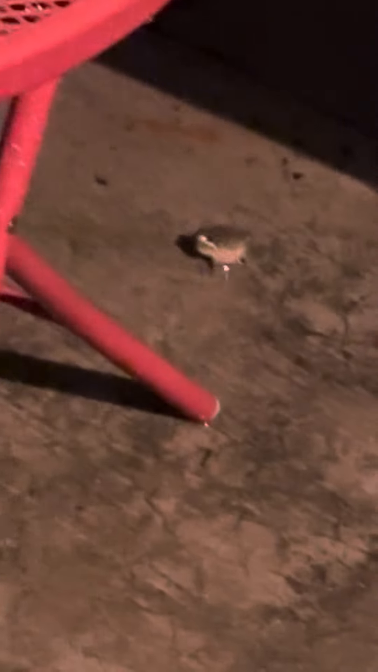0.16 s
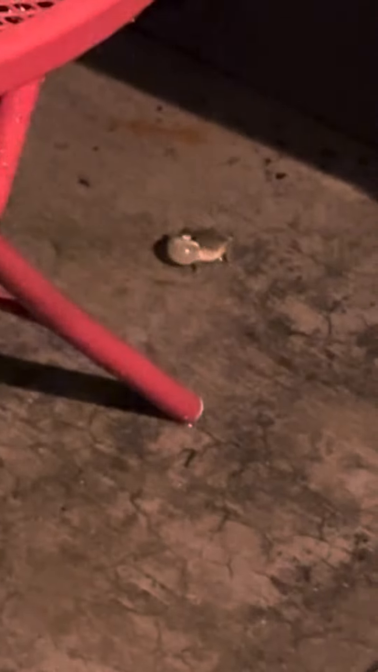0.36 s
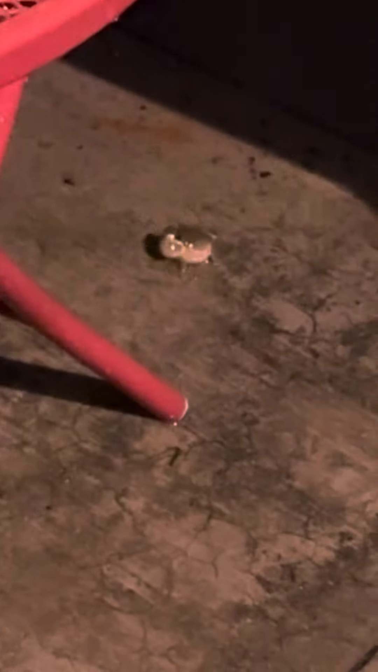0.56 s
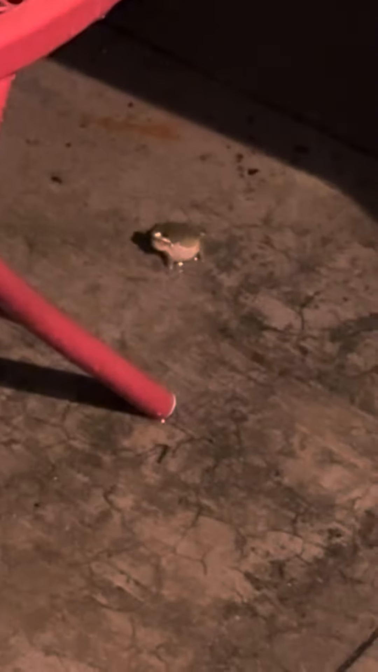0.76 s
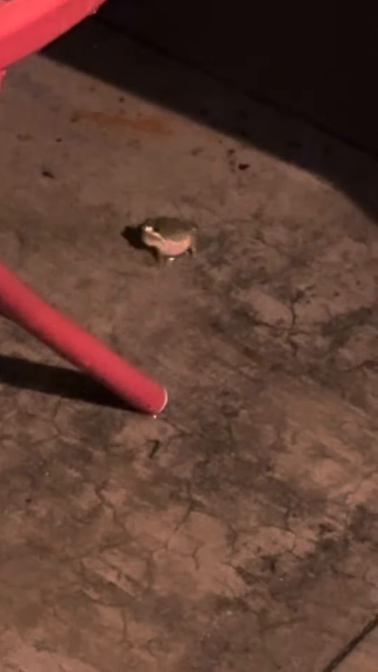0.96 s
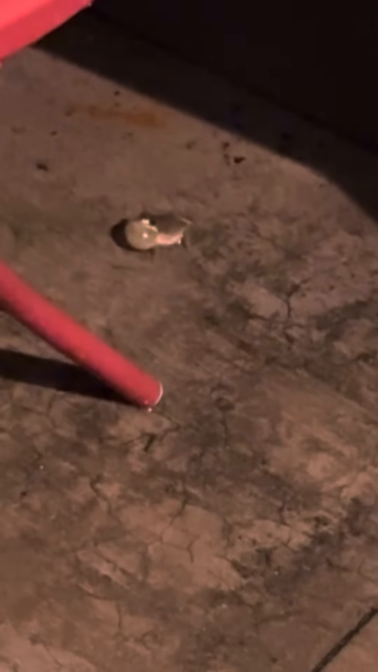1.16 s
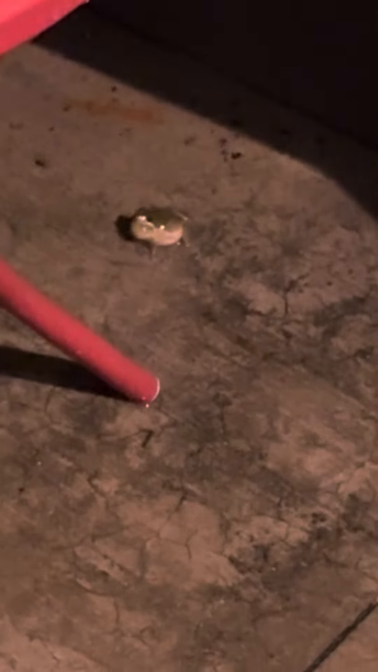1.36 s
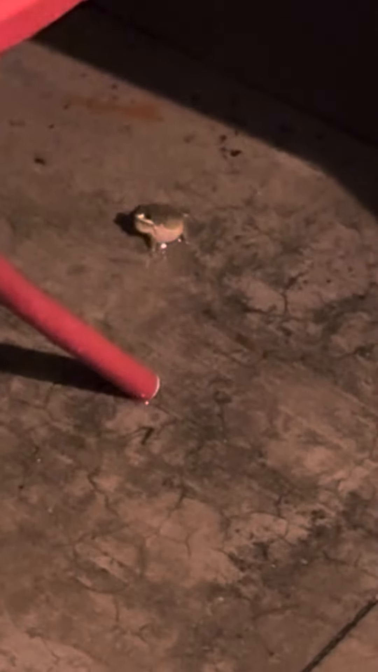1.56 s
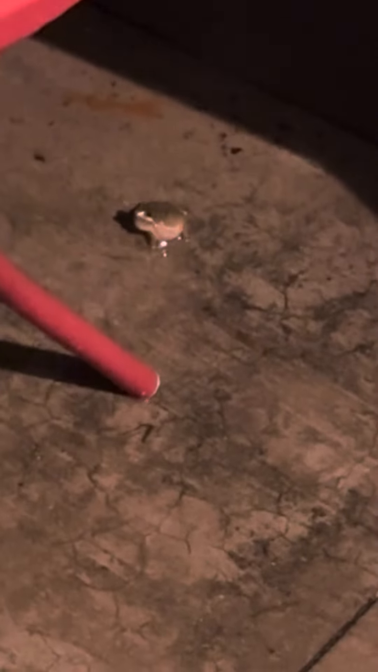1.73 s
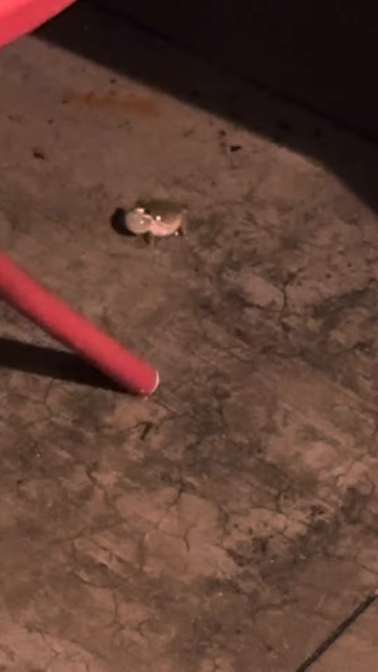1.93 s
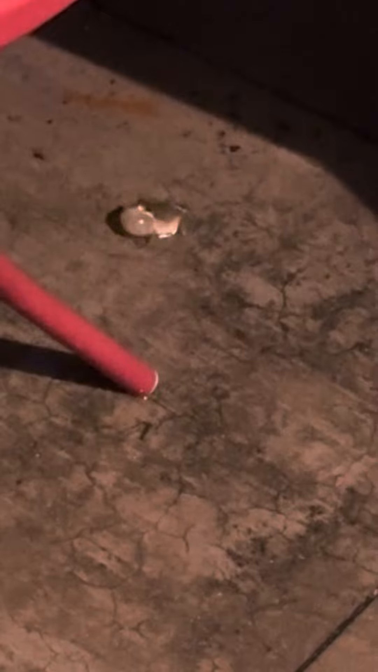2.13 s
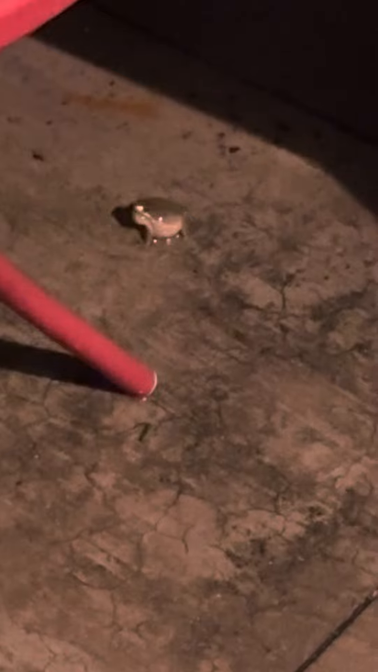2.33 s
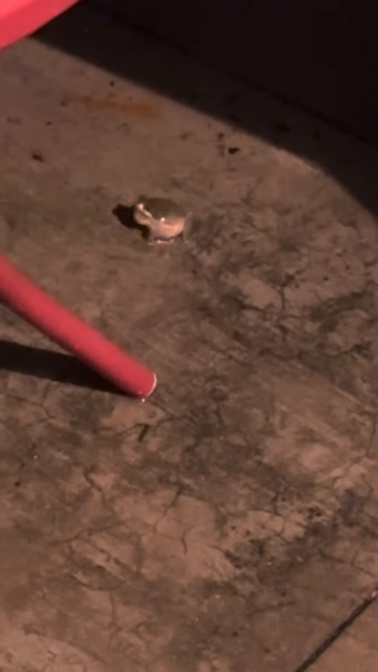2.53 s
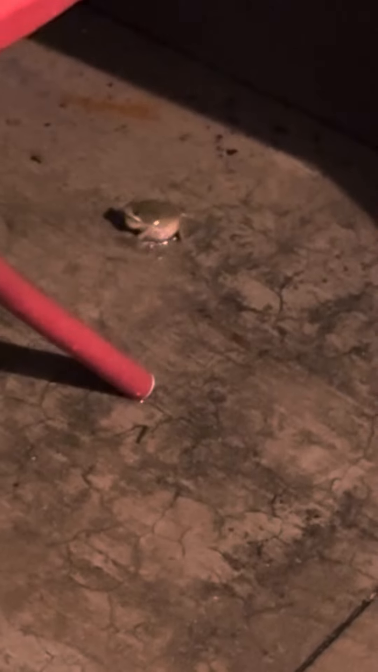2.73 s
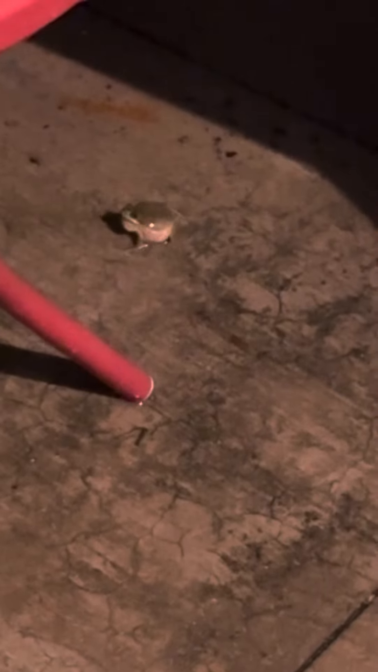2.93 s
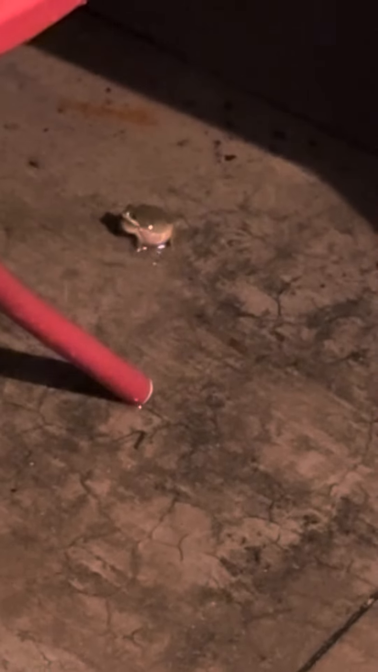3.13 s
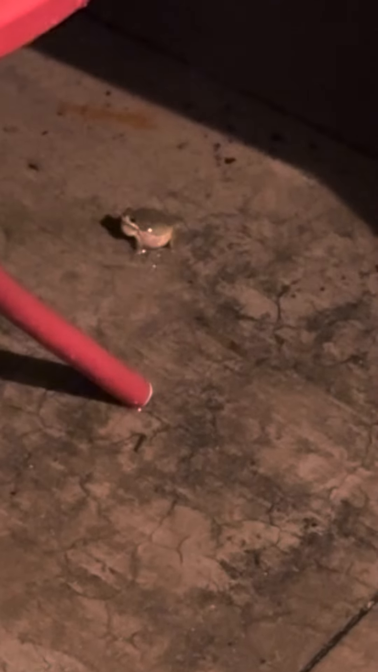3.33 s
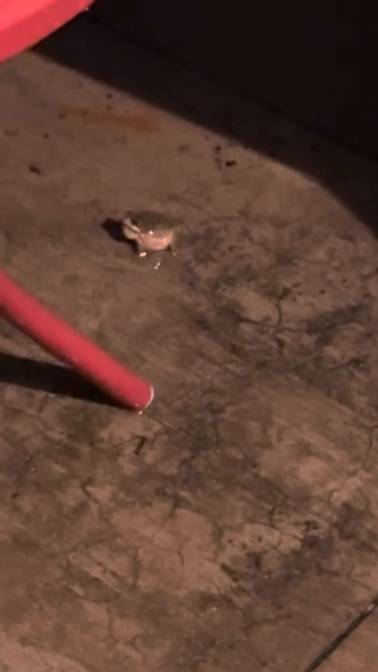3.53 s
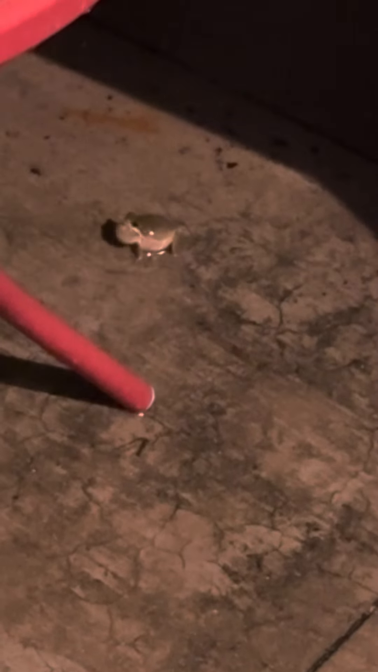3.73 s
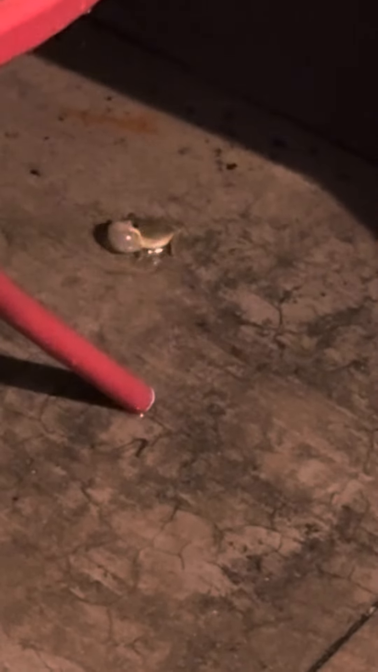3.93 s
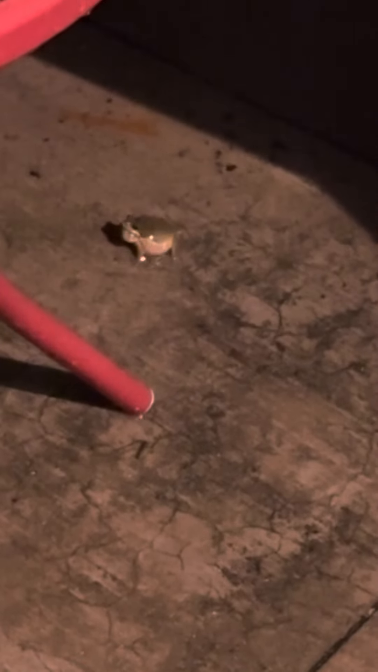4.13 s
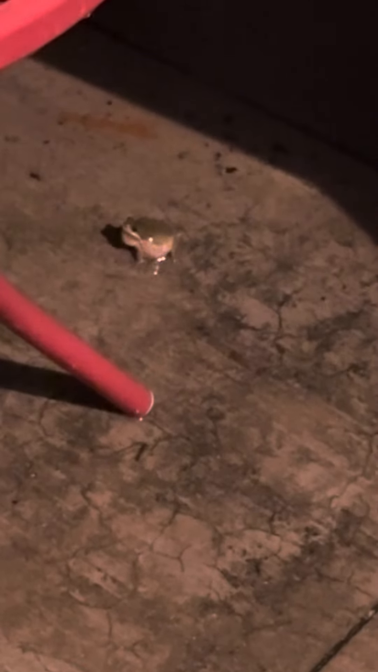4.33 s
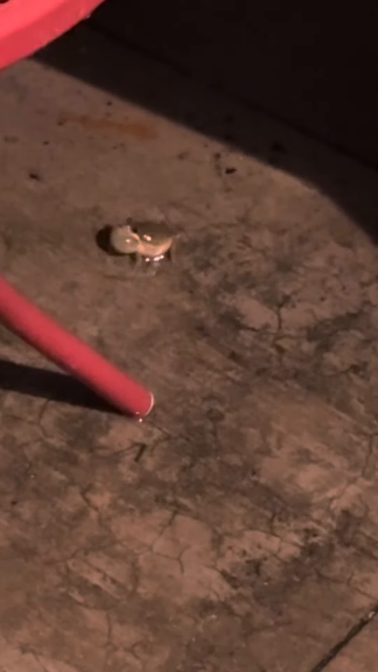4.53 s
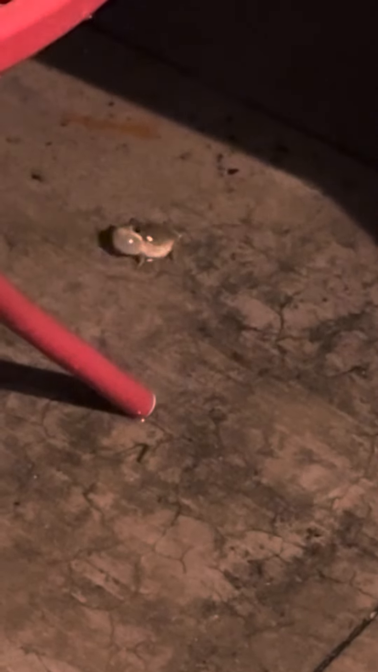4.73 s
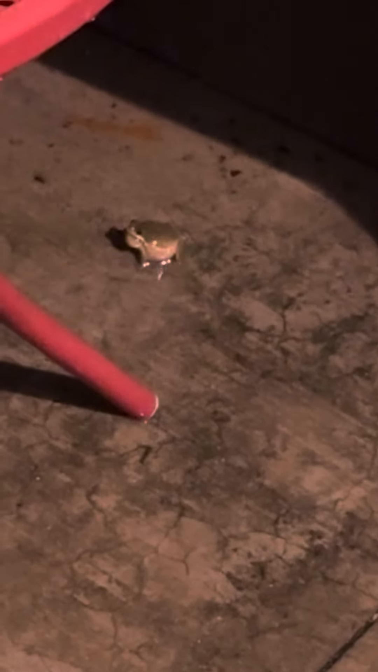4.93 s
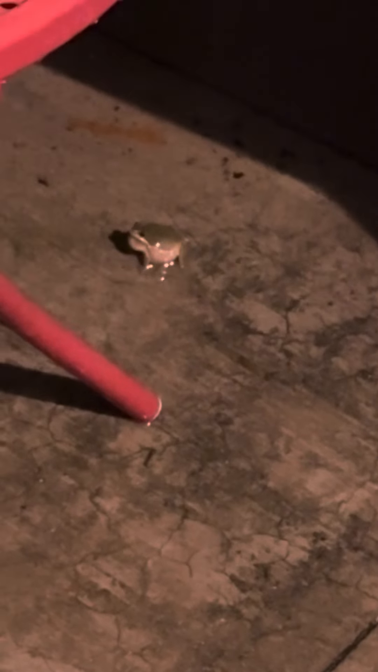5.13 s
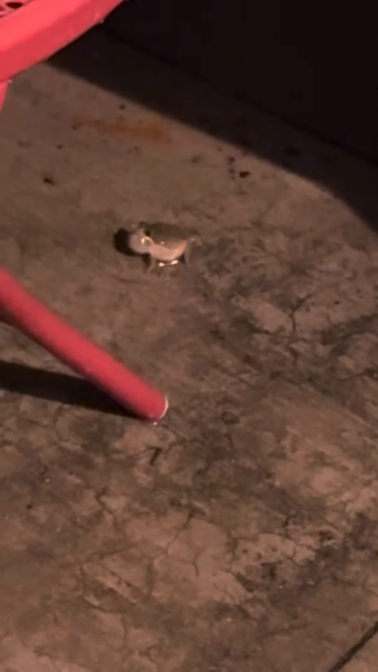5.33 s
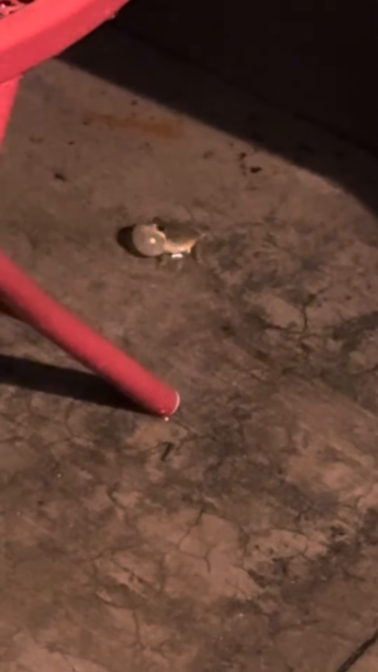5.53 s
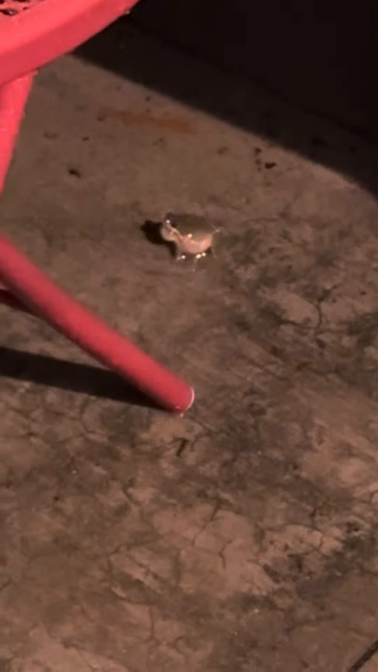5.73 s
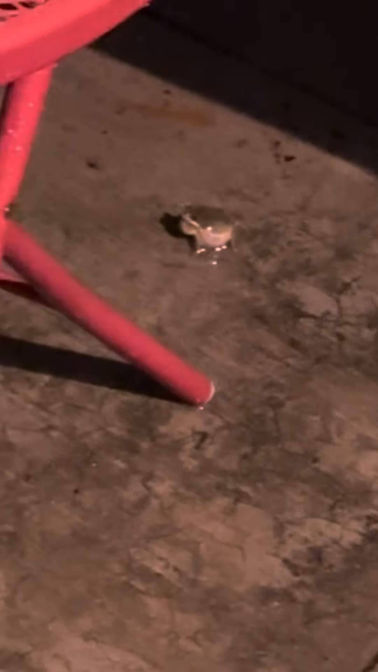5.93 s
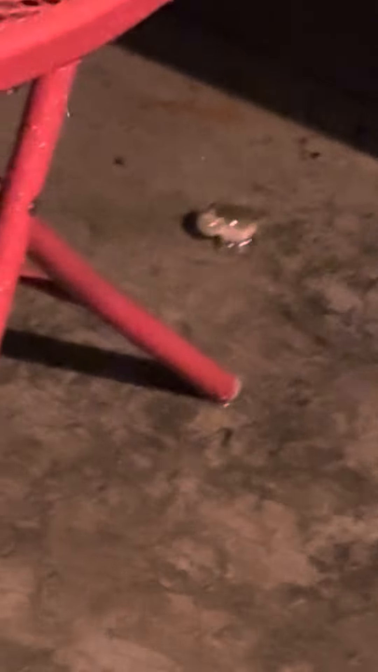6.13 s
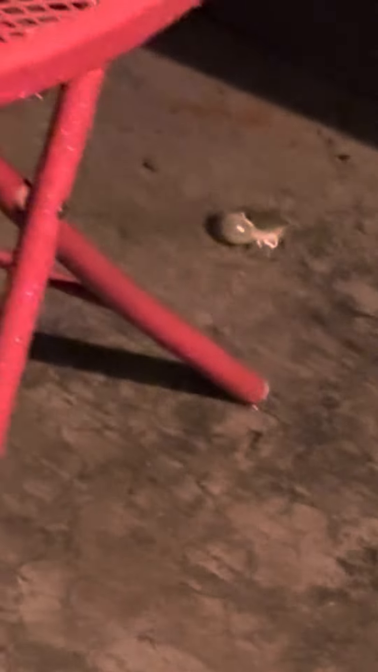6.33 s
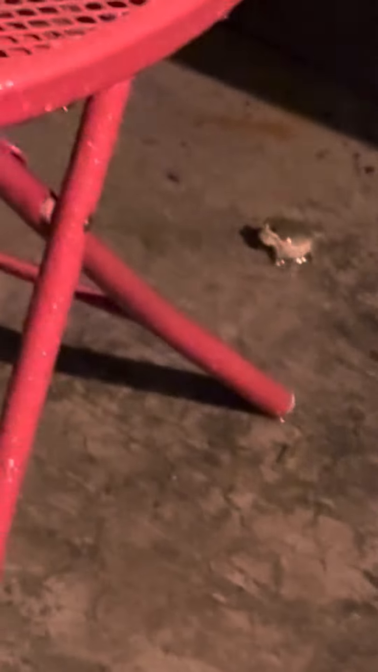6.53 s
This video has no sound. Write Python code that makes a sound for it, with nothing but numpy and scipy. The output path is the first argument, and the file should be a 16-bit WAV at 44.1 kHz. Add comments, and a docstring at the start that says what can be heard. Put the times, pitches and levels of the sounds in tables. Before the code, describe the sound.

Steady outdoor night air: soft distant traffic rumble below, thin light rain hiss above, and sparse sharp clicks of single drops. Over it a little frog repeats a loud ratcheting chirp, fast pulses fused into a rough, nasal creak, seven times at uneven intervals with a pause after the third. Stereo pickup from nearby, fairly dry, with a close wall echo and a very short open-air tail.

```python
"""Night on wet concrete: traffic rumble and steady air (low traffic hum, light rain hiss above), both
shaped noise, run throughout. Single drops tick from the start, each a short band-limited noise crack.
From 0.18 s a small tree frog calls seven times: trains of about 25 pulses, each briefly sounding the
modes of throat, vocal sac and head; a near wall and a short tail echo it.
All is heard in stereo, left and right differing in phase and level by frequency."""
import sys
import numpy as np
from scipy import signal
from scipy.fft import rfft, irfft, next_fast_len
from scipy.io import wavfile
from scipy.ndimage import uniform_filter1d, map_coordinates

SR = 44100
rng = np.random.default_rng(int(sys.argv[2]) if len(sys.argv) > 2 else 0)


def invert_db(x):
    """Field ratio 10**(x/20) for x, a level in decibels (scalar or array-like)."""
    u = np.asarray(x, float) / 20
    return 10 ** u


def bounce(signal):
    """Save signal as a 16-bit WAV file at the path given by the first command-line argument."""
    frames = np.transpose(np.atleast_2d(signal))
    limited = np.clip(frames, -1, 1)
    pcm = np.round(limited * 32767).astype(np.int16)
    wavfile.write(sys.argv[1], SR, pcm)


N = 289737


def unit(x):
    """Scale to rms 1."""
    return x / np.sqrt(np.mean(x ** 2) + 1e-20)


def along(points, hz):
    """Interpolate (frequency [Hz], value) points on a log frequency axis."""
    point_hz, value = np.transpose(points)
    return np.interp(np.log(hz + 1), np.log(point_hz + 1), value)


def wobble(knots_per_s):
    """Smooth random curve through Gaussian knots."""
    knots = rng.standard_normal(int(N * knots_per_s / SR) + 4)
    return map_coordinates(knots, [np.arange(N) * knots_per_s / SR])


def filtered(x, response):
    """Apply a complex response of frequency [Hz] by FFT."""
    size = next_fast_len(N + 8192)
    spectrum = rfft(x, size) * response(np.fft.rfftfreq(size, 1 / SR))
    return irfft(spectrum, size)[..., :N]


def noise(spectrum, patchy_db):
    """Coloured noise of rms 1, with random gain patches in time and frequency."""
    z = signal.stft(rng.standard_normal(N + 512), nperseg=512)[2]
    field = uniform_filter1d(rng.standard_normal(z.shape), 8, 0)
    field = unit(uniform_filter1d(field, 8, 1))
    x = signal.istft(z * invert_db(patchy_db * field), nperseg=512)[1][:N]
    return unit(filtered(x, lambda hz: invert_db(along(spectrum, hz))))


# traffic rumble spectrum: (frequency [Hz], relative density [dB per Hz])
RUMBLE_SPECTRUM = [(12, -64), (20, -32), (35, -17.5), (54, 0), (86, -1), (120, -4.5), (160, -32),
                   (260, -120)]


def rumble():
    """Low-frequency traffic noise of rms 1, common to left and right."""
    return noise(RUMBLE_SPECTRUM, patchy_db=-0.55)


# steady air, low traffic hum below about 500 Hz and rain hiss above:
# (frequency [Hz], relative density [dB per Hz])
AIR_SPECTRUM = [(130, 17), (220, 13), (400, 6.5), (700, 3.5), (1300, 4), (2200, -1), (3000, 3), (4000, -2),
                (5200, -3.5), (6500, -0.5), (9500, -1), (10700, -0.5), (12000, -9.5), (15700, -6)]
# stereo side noise of the air by band: (frequency [Hz], filter gain [dB])
SIDE_GAIN = [(150, -74), (400, -12), (900, -14), (1400, -12.5), (1800, -83), (4500, -78.5), (4950, 6),
             (5350, -75), (6600, -83), (7200, -10), (9000, -6), (11200, -7), (11800, -76), (13700, -78),
             (14300, -12), (15800, -11)]


def steady_air():
    """Traffic hum and rain hiss: common noise of rms 1, plus side noise of opposite sign left and right."""
    spectrum = [(70, -25)] + AIR_SPECTRUM
    side = noise(spectrum, patchy_db=-0.5)
    side = filtered(side, lambda hz: invert_db(along(SIDE_GAIN, hz)))
    return noise(spectrum, patchy_db=1.5) + np.array([side, -side])


# night before flutter: (time [s], rumble level [dB], common steady air level [dB])
NIGHT_LEVELS = [(0.0, -38.5, -38.5), (0.5, -39, -38.5), (1.4, -43, -39.5), (1.7, -40.5, -39),
                (3.2, -42.5, -40), (4.3, -40, -39), (4.7, -45.5, -40), (5.45, -43, -39), (5.8, -44.5, -41),
                (6.57, -45.5, -40.5)]


def night():
    """Rumble and steady air on slow level curves, each with a small random flutter."""
    time_s, *levels = np.transpose(NIGHT_LEVELS)
    rumble_db, air_db = [np.interp(np.arange(N) / SR, time_s, level) for level in levels]
    rumble_db = rumble_db + 0.27 * wobble(6.4)
    air_db = air_db + 0.5 * wobble(12) + 0.3 * wobble(5)
    return invert_db(rumble_db) * rumble() + invert_db(air_db) * steady_air()


# loudest drops: (time [s], level before band filter [dB], centre frequency [Hz])
LOUD_DROPS = [(.3624, -19, 7850), (.5866, -26, 9200), (1.31, -22.5, 8500), (1.4523, -24, 6000),
              (1.939, -19, 10900), (2.2623, -25, 13100), (2.398, -22, 13500), (2.548, -22, 8950),
              (2.6813, -25, 10000), (3.576, -26, 6600), (3.6606, -24, 8000), (4.0087, -20, 9000),
              (4.1125, -25.5, 9000), (4.2423, -31.5, 9000), (4.444, -19, 7650), (6.0026, -27, 7950),
              (6.2985, -22, 11000)]


def drops():
    """Each drop is a decaying noise crack in its own band; 400 faint ones fall at random."""
    time_s, db, hz = np.transpose(LOUD_DROPS)
    chance = rng.random((400, 3))
    time_s = np.r_[time_s, chance[:, 0] * N / SR]
    db = np.r_[db, -42 - 3.8 * np.log(chance[:, 1] + .01)]
    hz = np.r_[hz, 5500 + 9500 * chance[:, 2]]
    lead_in_s, decay_60db_s = .001, .02
    t = np.arange(512) / SR - lead_in_s
    crack = rng.standard_normal((len(time_s), len(t)))
    crack *= invert_db(db[:, None] - 60 * t / decay_60db_s) * (t > 0)
    octaves = np.log2(np.fft.rfftfreq(len(t), 1 / SR) / hz[:, None] + 1e-9)
    crack = irfft(rfft(crack) * invert_db(-14 * octaves ** 2))
    out = np.zeros(N + 1024)
    np.add.at(out, (time_s * SR).astype(int)[:, None] + np.arange(len(t)), crack)
    return out[round(lead_in_s * SR):][:N]


# Frog parts, in order: 0 throat, 1 slack sac, 2 taut sac, 3 head.
# swell of every call: (time since start [pulses], throat, slack sac, taut sac, head level [dB])
SWELL_LEVELS = [(-0.5, -47, -65, -61, -61), (0.6, -36, -45, -46, -55), (2.33, -31, -30.5, -41.5, -45.5),
                (4, -29.5, -29.5, -28.5, -46.5), (8, -27.5, -25.5, -20.5, -47.5),
                (11.5, -28, -34, -14, -45), (16, -28.5, -34, -13.5, -41), (19.5, -29.5, -38, -14.5, -42)]
# close of every call: (time to last pulse [pulses], throat, slack sac, taut sac, head change [dB])
CLOSE_LEVELS = [(0, -5.5, 3, -17, -13), (1.1, -1.5, 6, -5.5, -2.5), (2.2, -1.5, 5, -1.9, 1.5),
                (4, 0, 1.5, 0, 1.5)]
# share of the sac's lateness that delays each part's swell: one ratio per part
LATE_SHARES = [1, 0.58, 0.85, 0.71]


def part_levels(pulse, left, effort):
    """Levels [dB] of the four parts per pulse: swell, close and the call's own effort."""
    strength_db, late_pulses, slack_db, last_db, head_db = effort
    since_start, *swells = np.transpose(SWELL_LEVELS)
    before_end, *closes = np.transpose(CLOSE_LEVELS)
    levels = []
    for swell, close, share in zip(swells, closes, LATE_SHARES):
        level = strength_db + np.interp(pulse - share * late_pulses, since_start, swell)
        level = level + np.interp(left, before_end, close) + last_db * (left == 0)
        levels.append(level)
    opening_pulses = 11
    levels[1] = levels[1] + slack_db
    levels[3] = levels[3] + head_db * np.exp(-(pulse / opening_pulses) ** 2)
    return levels


# tuning by part: (flat at start [%], half tuned at [pulse], spread [pulses], flat at end [%])
PART_TENSION = [(6, 1.2, .6, 0.3), (8.5, 3.4, .5, 9), (2, 16, 2, 1.5), (6, 1.5, .8, 3)]


def part_tunings(pulse, left, late_pulses, sharp_percent):
    """Pitch ratios of the four parts: flat at first, tuned as the sac fills, slackening at the end."""
    filled, slacken_pulses = pulse - late_pulses, .5
    tunings = []
    for start_percent, until, spread, end_percent in PART_TENSION:
        flat_percent = start_percent / (1 + np.exp((filled - until) / spread))
        flat_percent = flat_percent + end_percent * np.exp(-left / slacken_pulses)
        tunings.append(1 - flat_percent / 100)
    tunings[2] = tunings[2] + sharp_percent / 100
    return tunings


# modes before tuning and scatter:
# (part, frequency [Hz], level over part [dB], peak time [ms], rise to peak [ms], fall [ms])
MODES = [(0, 1252, 9, 1.17, 3.44, 1.09), (0, 1741, -3.5, -0.85, 0.98, 6.6),
         (0, 2217, 1.5, -0.63, 2.45, 1.37), (1, 2565, 7.5, 0.9, 2.1, 1.4), (1, 2552, 0.5, 5, 1.6, 2),
         (2, 2923, 8, 1.34, 2.43, 1.9), (2, 3343, -10.5, 2.4, 4.3, 0.66), (3, 4070, 14.5, 1.9, 2.6, 1.1),
         (3, 3610, 12.5, 1.04, 1.9, 0.38), (3, 4580, 3, 2.6, 4.3, 1.3), (3, 5485, 4.5, 1.3, 3.1, 0.8),
         (3, 6250, 2, 3.7, 1.5, 0.88), (2, 7460, -15.5, -0.2, 1.1, 0.53), (2, 8360, -19, 3.5, 3.3, 1.2)]


def pulse_modes(since, pulse, levels, tunings):
    """Yield each mode's sines under Gaussian swells; most fall faster than they rise as the folds close."""
    count = len(pulse)
    taut_lag_ms_per_pulse = .035
    pulse_pitch = 1 + .004 * rng.standard_normal(count)
    for part, hz, db, peak_ms, rise_ms, fall_ms in MODES:
        # high modes scatter more in pitch and phase
        scatter = rng.standard_normal((3, count))
        tuning = tunings[part] * pulse_pitch * (1 + .009 * (hz / 8000) ** 2 * scatter[0])
        level_db = db + levels[part] + .7 * scatter[1]
        slip_rad = 1.6 * (hz / 5000) ** 3 * scatter[2]
        late_ms = since * 1000 - peak_ms
        if part == 2:  # taut sac peaks ever later in the pulse
            late_ms = late_ms - taut_lag_ms_per_pulse * (pulse[:, None] - count / 2)
        swell = np.exp(-(late_ms / np.where(late_ms < 0, rise_ms, fall_ms)) ** 2)
        sign = (-1) ** round(hz / 420)  # modes 420 Hz apart move in opposition
        phase = 2 * np.pi * hz * tuning[:, None] * since + slip_rad[:, None]
        yield invert_db(level_db)[:, None] * swell * sign * np.sin(phase)


# calls before timing scatter: (first pulse [s], pulse period [ms], pulses [count])
CALLS = [(.1785, 10.43, 25), (.9696, 10.43, 25), (1.8385, 10.43, 25), (3.6634, 10.27, 25),
         (4.3933, 10.35, 25), (5.2609, 10.30, 26), (6.0310, 10.37, 26)]
# effort by call: (strength [dB], sac fills late by [pulses], slack sac [dB], last pulse [dB],
# head at opening [dB])
CALL_EFFORT = [(0, 0.1, -1, 3, 0), (0, 0.071, -2, -3.5, 2), (-0.5, 0.079, -1.5, -10, 0),
               (0, 1.1, 0.5, -1.5, -4.5), (0, 0.79, 1, 1.5, -3), (-0.5, 0.86, 1, 0.5, -1),
               (-0.5, 0.69, 0.1, 3.5, -2.5)]
# taut sac pitch over its modes, by call: sharpness [%]
TAUT_SHARPNESS = [0.4, 0.6, 0.5, 2.1, 1.5, 1.9, 1.9]


def frog():
    """Pulse trains of breath excite all modes; the last pulses come late as the breath runs out."""
    t = np.arange(-512, 512) / SR
    out = np.zeros(N + SR)
    for (first_s, period_ms, count), effort, sharp_percent in zip(CALLS, CALL_EFFORT, TAUT_SHARPNESS):
        pulse = np.arange(count)
        left = pulse[::-1]
        at_ms = pulse * period_ms + 2.56 * np.exp(-left / 1.216)
        at_s = first_s + (at_ms + 0.078 * rng.standard_normal(count)) / 1000
        levels = part_levels(pulse, left, effort)
        tunings = part_tunings(pulse, left, effort[1], sharp_percent)
        centre = np.round(at_s * SR).astype(int)
        since = t + (centre / SR - at_s)[:, None]  # keeps sub-sample timing
        for tones in pulse_modes(since, pulse, levels, tunings):
            np.add.at(out, centre[:, None] + np.arange(len(t)), tones)
    return out[len(t) // 2:][:N]


def yard(x):
    """One reflection from a near wall, then a short decaying-noise tail of open air."""
    wall_s, wall_db, tail_start_s, tail_db, decay_60db_s = .0043, -17.5, .012, -20.5, .19
    t = np.arange(SR // 2) / SR
    echo = rng.standard_normal(len(t)) * invert_db(-60 * t / decay_60db_s) * (t > tail_start_s)
    echo *= invert_db(tail_db) / np.linalg.norm(echo)
    echo[round(wall_s * SR)] += invert_db(wall_db)
    return signal.fftconvolve(x, echo)[:N]


def scene():
    """Night air, drops, frog and its echoes."""
    call = frog()
    return night() + drops() + call + yard(call)


# stereo phase and level of left against right:
# (frequency [Hz], phase lead [half turns], level [dB])
STEREO_DIFFERENCE = [(300, 0, 0), (600, .1, 2.4), (950, .15, 2.6), (1300, .07, 1.2), (1750, 0, 0),
                     (4600, 0, 0), (4830, -.2, 0), (5080, -1.7, 0), (5250, -2, 0), (6700, -2, 0),
                     (7700, -2.3, 0), (11400, -3, 0), (13700, -3, 0), (15800, -3.35, 0)]


def stereo(dry):
    """Split the phase and level difference evenly over left and right; cut above the top frequency."""
    top_hz = 15830
    point_hz, lead, db = np.transpose(STEREO_DIFFERENCE)

    def response(hz):
        phase_rad = np.pi * np.interp(hz, point_hz, lead)
        log_gain = np.log(invert_db(np.interp(hz, point_hz, db)))
        half = (1j * phase_rad + log_gain) / 2
        return np.exp([half, -half]) * (hz < top_hz)

    return filtered(dry, response)


def top_cut(x):
    """Nothing passes above the cut-off."""
    return signal.sosfilt(signal.butter(12, 17120, fs=SR, output="sos"), x)


def record(dry):
    """Finish the scene as a left and right channel."""
    mix = stereo(dry)
    return top_cut(mix)


dry = scene()
out = record(dry)
bounce(out)
```